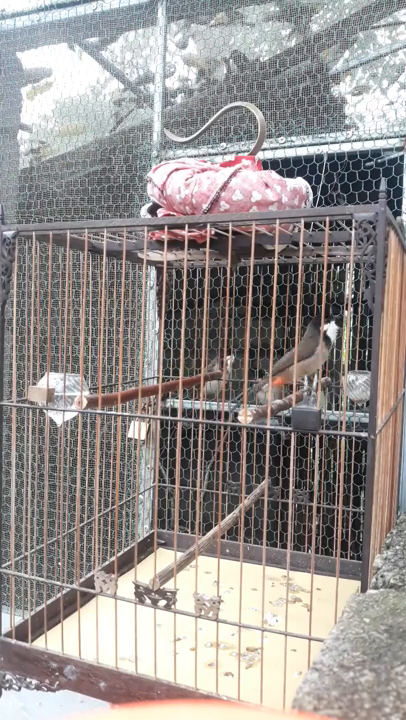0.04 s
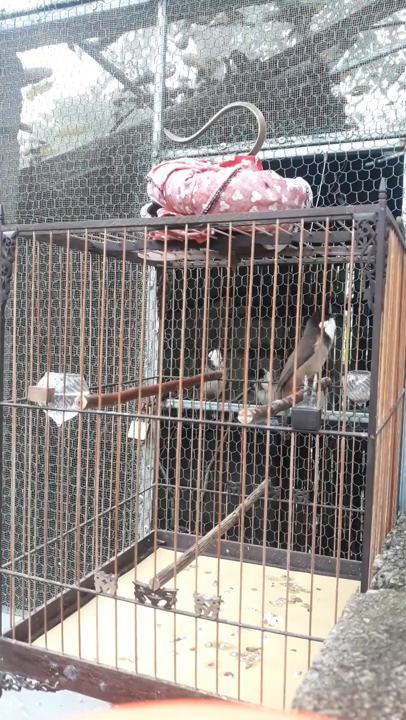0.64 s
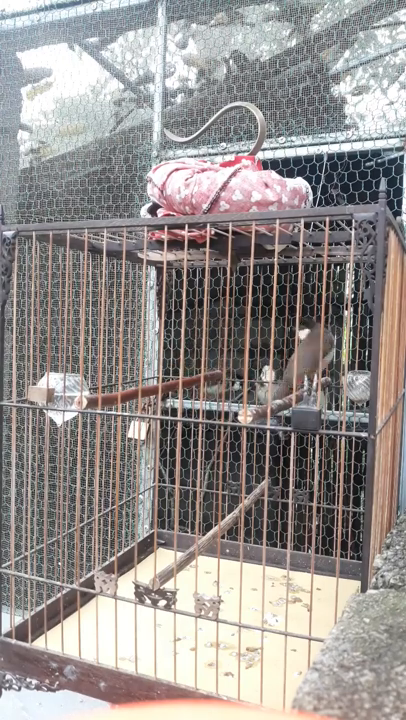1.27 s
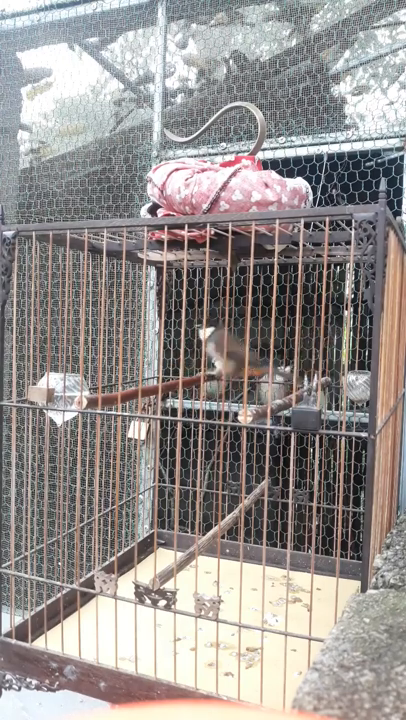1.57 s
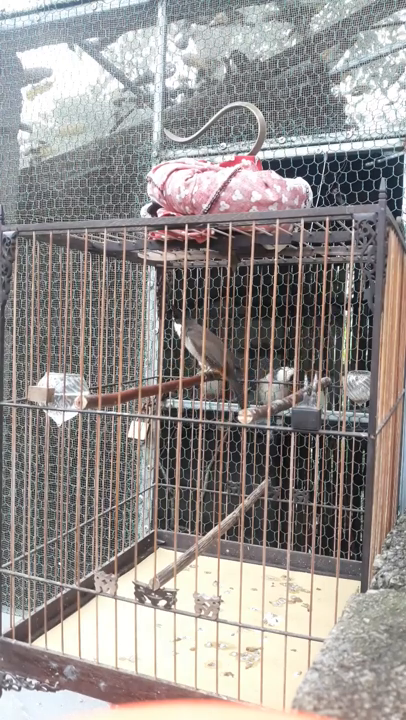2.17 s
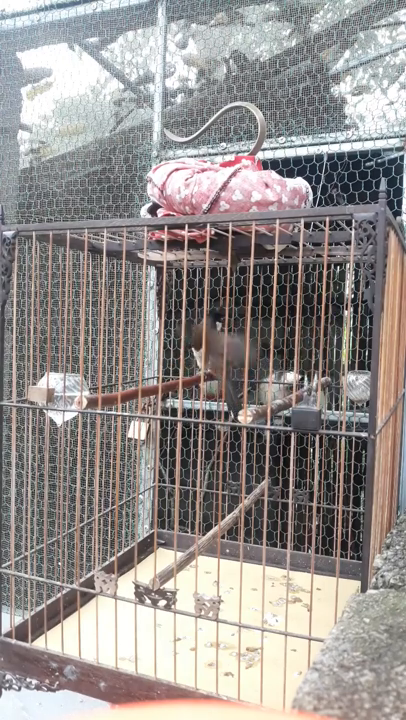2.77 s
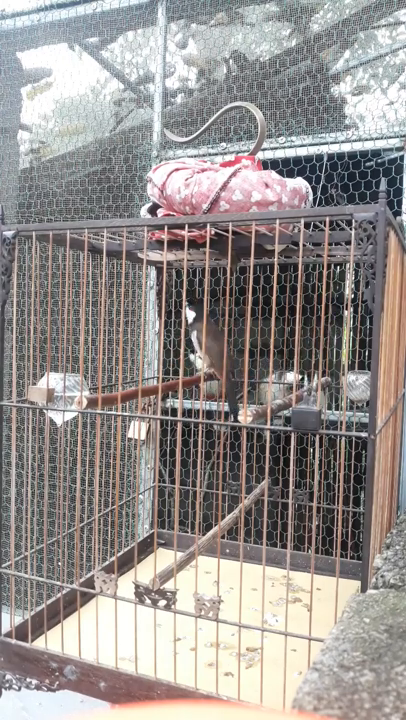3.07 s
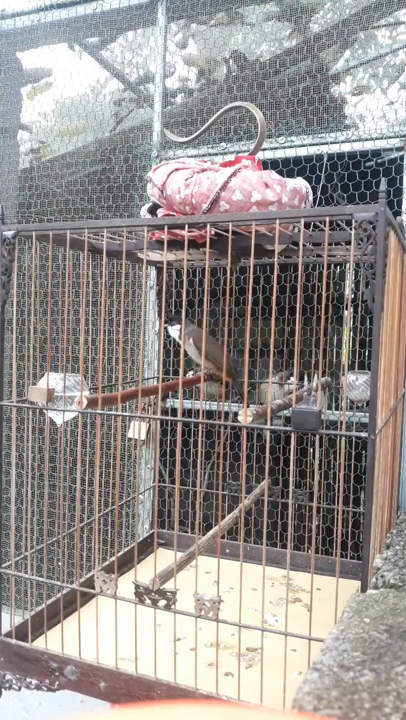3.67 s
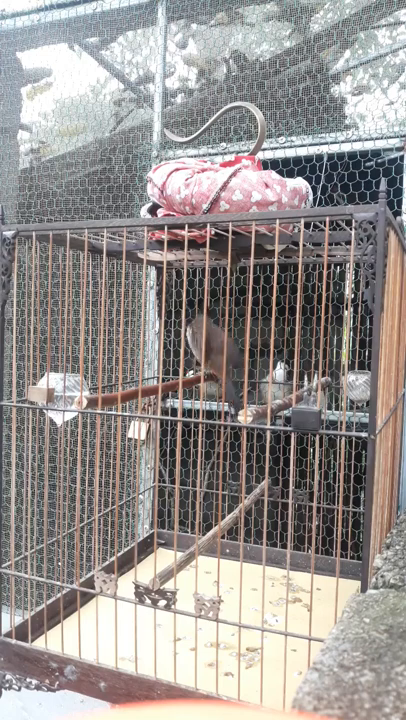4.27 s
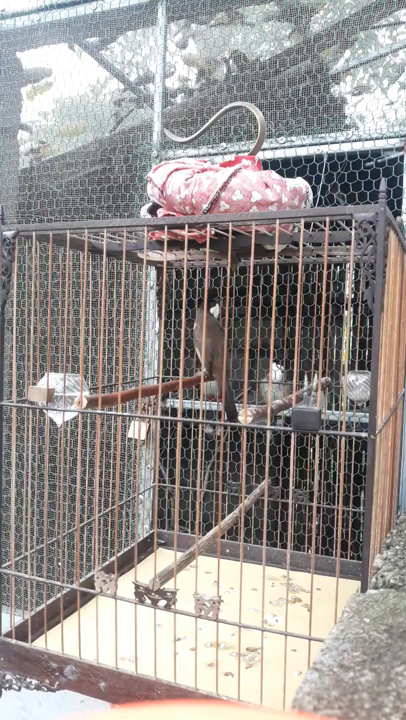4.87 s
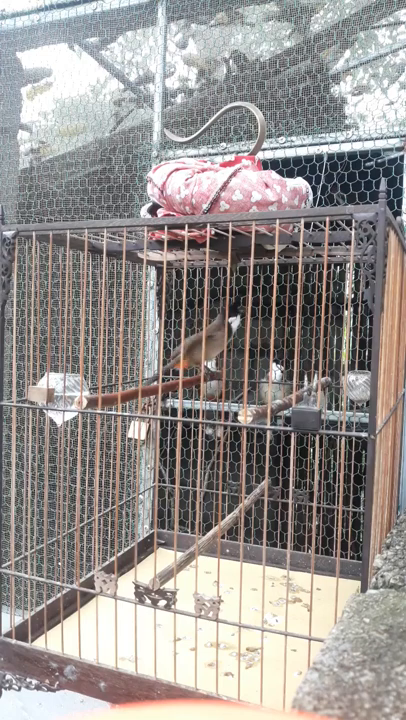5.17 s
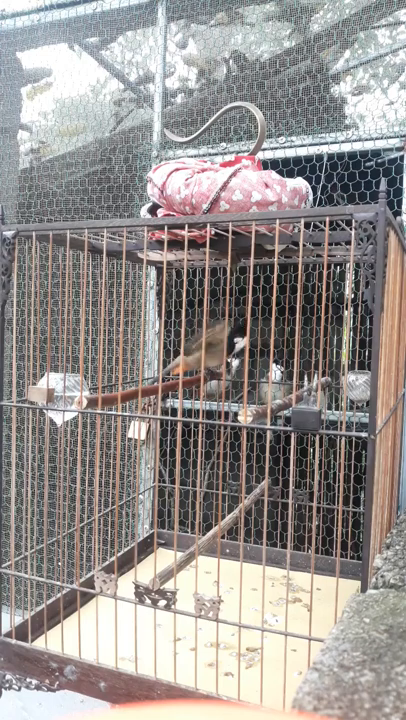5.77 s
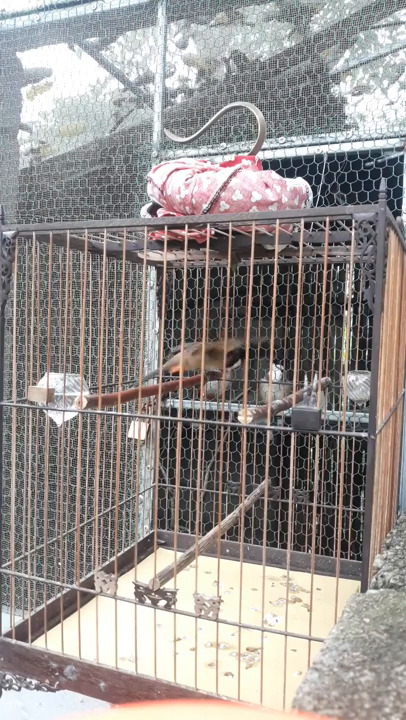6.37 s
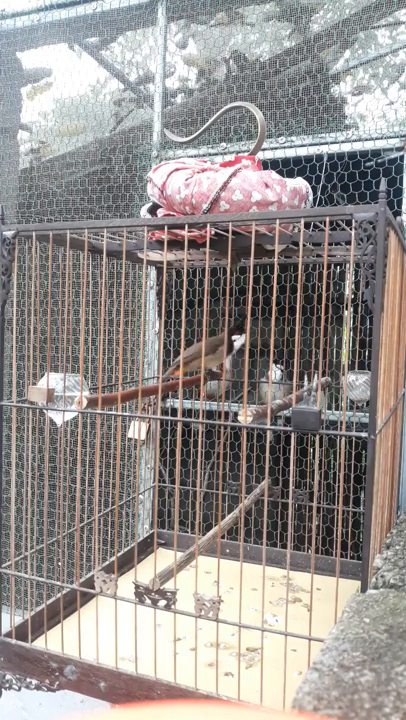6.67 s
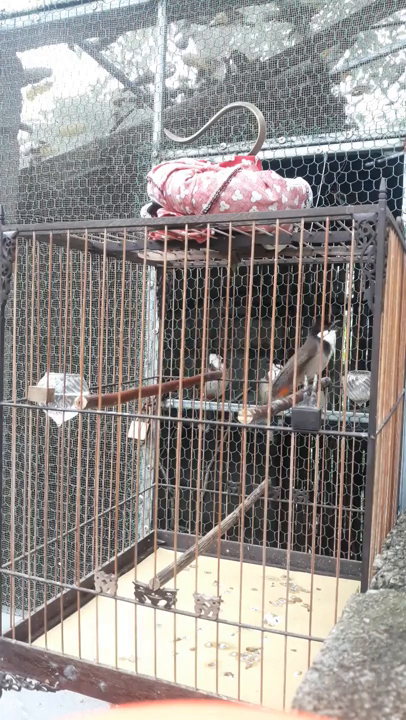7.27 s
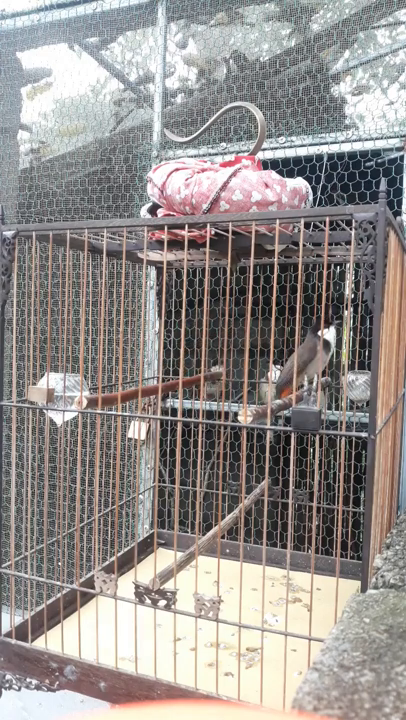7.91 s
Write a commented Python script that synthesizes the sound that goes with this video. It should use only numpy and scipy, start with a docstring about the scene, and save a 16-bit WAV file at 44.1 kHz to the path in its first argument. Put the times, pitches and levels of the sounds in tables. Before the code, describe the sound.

Bright chirps and short trilled phrases from a nearby bird, with faint wing flutters, farther birds and cicadas outdoors.

```python
"""A yard with a netted shelter. Close by, a caged bulbul sings quick runs of whistled and trilled
notes, near-sine tones from its syrinx that echo off the cage, and now and then flutters on its perch.
Other bulbuls answer from further off, blurred by the yard, and a small bird adds thin slurs.
Cicadas hiss in the trees over a faint outdoor rumble, a wash of far birds and a few low hoots."""
import sys
import numpy as np
from scipy import signal
from scipy.fft import rfft, irfft
from scipy.io import wavfile
from scipy.ndimage import uniform_filter1d, minimum_filter1d, map_coordinates

SR = 44100
rng = np.random.default_rng(int(sys.argv[2]) if len(sys.argv) > 2 else 0)


def generate_wav(sig):
    """Save sig (samples, or channels by samples) to the path in sys.argv[1] as 16-bit PCM at SR."""
    pcm = np.round(np.clip(np.atleast_2d(sig).T, -1, 1) * 32767).astype(np.int16)
    wavfile.write(sys.argv[1], SR, pcm)


N = 350137
TIME = np.arange(N) / SR


def gain_of(db):
    return 10 ** (np.asarray(db) / 20)


def unit_rms(x):
    return x / np.sqrt(np.mean(x ** 2) + 1e-20)


def at_hz(points, hz):
    """Interpolates (Hz, value) points on a log-frequency axis."""
    point_hz, value = np.transpose(points)
    return np.interp(np.log(hz + 1), np.log(point_hz + 1), value)


def over_time(rows):
    """Interpolates (seconds, values..) rows; one signal per value column."""
    times_s, *columns = np.transpose(rows)
    return [np.interp(TIME, times_s, column) for column in columns]


def add(mix, start_s, sound):
    part = mix[max(round(start_s * SR), 0):][:len(sound)]
    part += sound[:len(part)]


def samples(start_s, end_s):
    return np.arange(max(int(start_s * SR), 0), min(int(end_s * SR), N))


def noise(spectrum):
    """Coloured noise, rms 1."""
    colour = gain_of(at_hz(spectrum, np.fft.rfftfreq(N, 1 / SR)))
    return unit_rms(irfft(rfft(rng.standard_normal(N)) * colour, N))


def wander(per_s):
    """Random curve, rms 1, with per_s knots a second."""
    knots = rng.standard_normal(N // 16)
    return unit_rms(map_coordinates(knots, [TIME * per_s], order=1, mode="wrap"))


def fade(count, rise_s, fall_s):
    """Envelope of count samples with soft edges."""
    t = np.arange(count) / SR
    return np.sin(np.pi / 2 * np.clip(t / rise_s, 0, 1) * np.clip((t[-1] - t) / fall_s, 0, 1)) ** 2


# Outdoor rumble and merged far birds. Each row: frequency in Hz, relative density in dB.
RUMBLE_SPECTRUM = [(15, -58), (25, -32), (98, -2.5), (149, -3.5), (329, -13.5), (445, -12.5), (485, -12.5),
                   (726, -16.5), (845, -11.5), (1090, -15), (1400, -7), (1820, -5), (3080, -120)]
CHORUS_SPECTRUM = [(900, -28), (1300, -17.5), (1650, -2), (2100, -9), (2500, -7), (3200, 4), (3800, -8),
                   (4800, -53)]
# Swell of the rumble. Each row: time in seconds, level before trim in dB.
RUMBLE_SWELL = [(0.0, -54), (0.97, -63), (1.7, -62.5), (2.76, -60.5), (2.87, -56.5), (3.56, -58),
                (3.85, -62), (4.33, -53.5), (4.49, -56.5), (4.84, -63), (5.31, -61), (5.46, -66.5),
                (6.08, -64.5), (6.85, -56), (7.16, -53.5), (7.38, -61), (7.94, -58)]
def yard_ambience(rumble_trim_db=3, chorus_db=-41.5, chorus_follow=0.67):
    """A low rumble, and a blur of far birds that rises and falls with it."""
    swell_db, = over_time(RUMBLE_SWELL)
    rumble = noise(RUMBLE_SPECTRUM) * gain_of(swell_db + rumble_trim_db + wander(6.9))
    chorus_swell_db = chorus_follow * (swell_db - swell_db.mean()) + 1.8 * wander(14)
    return rumble + noise(CHORUS_SPECTRUM) * gain_of(chorus_db + chorus_swell_db)


# The cicadas' two bands. Each row: frequency in Hz, relative density in dB.
WHINE_SPECTRUM = [(3000, -29.5), (3800, -1.5), (4150, -3), (4400, 1), (4650, -3.5), (5100, -0.5),
                  (5900, -5.5), (6300, -4), (6650, 5), (7000, -2.5), (7500, -9.5), (9000, -44)]
SIZZLE_SPECTRUM = [(6000, -33.5), (7000, -4), (7500, 1), (8500, 2.5), (9200, -5), (10000, -10.5),
                   (11000, -13.5), (12200, -18.5), (14200, -15.5), (15500, -23)]
# Their swell. Each row: time in seconds, whine before trim in dB, sizzle in dB.
CICADA_SWELL = [(0.0, -37.5, -41), (0.33, -39.5, -43), (0.57, -44.5, -46.5), (1.55, -44.5, -49.5),
                (2.41, -42.5, -50.5), (3.25, -39, -43), (4.25, -38, -40), (5.28, -41.5, -42),
                (5.64, -41, -47), (5.97, -41, -47), (6.9, -37, -40.5), (7.94, -37, -38.5)]
def cicadas(whine_trim_db=3):
    """Cicadas merge into a whine and a higher sizzle that slowly swell and ebb."""
    whine_db, sizzle_db = over_time(CICADA_SWELL)
    whine = noise(WHINE_SPECTRUM) * gain_of(whine_db + whine_trim_db + 0.5 * wander(90))
    sizzle = noise(SIZZLE_SPECTRUM) * gain_of(sizzle_db + 0.34 * wander(90))
    return whine + sizzle


# Far hoots. Each row: start in seconds, length in seconds, pitch in Hz, level in dB.
HOOT_NOTES = [(4.07, 0.13, 533, -58), (4.33, 0.19, 526, -59), (4.57, 0.08, 530, -58),
              (5.21, 0.088, 635, -56), (6.962, 0.057, 450, -43)]
def hoots():
    """Soft, pure low notes from afar."""
    out = np.zeros(N)
    for start_s, length_s, hz, db in HOOT_NOTES:
        t = np.arange(int(length_s * SR)) / SR
        tone = np.sqrt(2) * np.sin(2 * np.pi * hz * t)
        add(out, start_s, gain_of(db) * tone * fade(len(t), rise_s=0.051, fall_s=0.037))
    return out


# Decay of the yard's echo and of scatter off leaves and netting. Each row: frequency in Hz, T60 in seconds.
YARD_T60 = [(1000, 0.31), (2200, 0.45), (3400, 0.49), (12000, 0.32)]
SCATTER_T60 = [(1500, 0.38), (4000, 0.072)]
def echo(x, t60_curve, delay_s):
    """Sparse reflections of random sign, each band dying at its own rate."""
    taps = np.zeros(SR)
    slots = np.arange(0, SR - 20, 20)
    taps[slots + rng.integers(0, 20, len(slots))] = rng.choice([-1., 1.], len(slots))
    hz, t, bands = signal.stft(taps, SR, nperseg=256)
    decay = gain_of(-60 * t / at_hz(t60_curve, hz)[:, None])
    _, tail = signal.istft(bands * decay, SR, nperseg=256)
    response = np.concatenate([np.zeros(int(delay_s * SR)), tail / np.linalg.norm(tail)])
    return signal.oaconvolve(x, response)[:N]


def wire_sheen(x, cutoff_hz=6000):
    """Overtones scatter off the wires more than the note itself does."""
    treble = signal.sosfilt(signal.butter(6, cutoff_hz, "high", fs=SR, output="sos"), x)
    return echo(treble, YARD_T60, delay_s=0.0028)


# Early echoes off the cage and its stand. Each row: delay in seconds, gain.
CAGE_TAPS = [(.0023, 0.63), (.0041, -1.5), (.0068, 0.72), (0.0091, -0.82), (0.0138, 0.69), (0.018, -0.36)]
def cage(aside):
    """Sound sent aside comes back off the cage walls and the netting."""
    out = 0.4 * echo(aside, SCATTER_T60, delay_s=0.004)
    for delay_s, gain in CAGE_TAPS:
        add(out, delay_s, gain * aside)
    return out


# Overtones of a bird's note. Each row: multiple of the pitch, relative level before glint in dB.
HARMONICS = [(2, -34.5), (3, -38.5), (4, -55), (5, -35)]
# Glint of an overtone passing certain frequencies. Each row: frequency in Hz, gain in dB.
HARMONIC_GLINT = [(5000, 6), (6000, 0.5), (6900, 2.5), (8600, -1), (9600, -1.5), (10300, 4.5), (11200, 3),
                  (12200, 1), (13600, 1), (15500, -6)]
def syrinx(hz, db, depth_hz, trill_cycles, throb):
    """A near sine whose pitch and strength swing with each trill."""
    trill_phase = 2 * np.pi * trill_cycles
    phase = 2 * np.pi * np.cumsum(hz + depth_hz * np.cos(trill_phase)) / SR
    strength = gain_of(db) * (1 + throb * depth_hz / (depth_hz + 200) * np.sin(trill_phase))
    overtones = sum(gain_of(harmonic_db + at_hz(HARMONIC_GLINT, k * hz)) * np.sin(k * phase)
                    for k, harmonic_db in HARMONICS)
    return np.sqrt(2) * strength * (np.sin(phase) + overtones)


def faint_trills(count=32):
    """Random far trills spread loosely over the scene, in rows like FAR_TRILLS."""
    starts_s = (np.arange(count) + rng.random(count)) / count * TIME[-1]
    lengths_s = rng.uniform(0.046, 0.086, count)
    hz = rng.uniform(2790, 3810, count)
    db = rng.uniform(-52, -43, count)
    depths_hz = rng.uniform(120, 300, count)
    return list(zip(starts_s, lengths_s, hz, db, depths_hz))


# Far trills. Each row: start in seconds, length in seconds, pitch in Hz, source level in dB,
# trill depth in Hz.
FAR_TRILLS = [(0, 0.035, 2380, -21, 280), (0, 0.12, 3348, -26, 325), (0.096, 0.088, 4040, -29.5, 117),
              (0.392, 0.035, 1695, -35, 91.5), (0.504, .051, 3703, -20, 241),
              (0.706, 0.037, 3443, -28, 148.1), (0.791, 0.046, 3265, -31.5, 430),
              (0.919, 0.053, 3500, -31.5, 134), (1.031, 0.051, 3440, -22.5, 506),
              (1.589, 0.088, 2656, -31, 140), (1.655, 0.1, 3284, -36.5, 320),
              (1.865, 0.064, 3400, -37.5, 170), (2.797, 0.033, 3700, -32.5, 170),
              (2.864, .047, 2575, -41, 90), (2.905, .125, 2587, -35.5, 420),
              (3.292, 0.049, 2686, -33.5, 580), (4.145, 0.036, 3625, -30, 250),
              (4.204, 0.098, 3720, -29, 360), (4.229, .063, 2375, -32.5, 420),
              (4.319, .047, 3555, -27, 333), (4.385, 0.079, 2880, -34, 290),
              (4.986, .14, 3726, -24.5, 140.4), (5.036, 0.033, 3840, -23, 334.8),
              (5.185, .072, 3385, -22, 441), (5.237, 0.06, 3522, -19, 459), (5.26, 0.037, 2530, -28, 100),
              (5.384, 0.05, 3444, -25, 630), (5.529, .067, 2887, -27.5, 435),
              (5.679, 0.057, 3130, -30, 375), (5.879, 0.15, 2396, -34.5, 105),
              (6.011, 0.037, 3330, -24.5, 440), (6.066, .073, 3053, -23, 290),
              (6.222, 0.062, 2580, -31.5, 632), (6.294, 0.024, 2540, -24, 600),
              (6.33, 0.023, 1896, -34.5, 86.4), (6.754, 0.024, 2790, -22.5, 205.2),
              (7.177, 0.2, 2695, -37, 265), (7.221, 0.051, 4010, -31.5, 432),
              (7.362, 0.063, 3540, -28, 174), (7.513, 0.063, 3210, -24, 255),
              (7.743, 0.051, 3740, -32, 320)]
# Far whistles. Each row: start in seconds, length in seconds, first and last pitch in Hz,
# source level in dB.
FAR_GLIDES = [(.23, 0.043, 2345, 2360, -26.5), (0.622, 0.11, 1530, 1379, -48.5),
              (.68, .036, 3246, 3255, -20), (0.827, 0.038, 3940, 3810, -27),
              (0.989, 0.046, 2318, 2326, -33.5), (2.318, 0.13, 3000, 2760, -46),
              (2.637, 0.069, 2830, 2480, -40), (3.015, 0.038, 2600, 1890, -42.5),
              (3.225, 0.05, 3200, 2810, -36), (3.308, 0.061, 2420, 2003, -44),
              (3.409, 0.054, 2965, 2800, -36.5), (4.555, 0.044, 3520, 3310, -31),
              (5.32, 0.068, 3407, 2826, -23.5), (5.59, 0.085, 2866, 2704, -34.5),
              (6.188, .03, 1896, 2013, -35), (6.789, 0.036, 2023, 1760, -34.5),
              (7.782, 0.081, 3078, 3000, -18)]
def far_bulbuls(trills_per_s=100, jitter=0.013, climb_per_depth=0.85, waver_hz=61):
    """Birds further off answer with loose, climbing trills and mostly held or falling whistles."""
    out, unsteady, drift = np.zeros(N), wander(400), wander(50)
    notes = []
    for start_s, length_s, hz, db, depth_hz in FAR_TRILLS + faint_trills():
        half_climb_hz = climb_per_depth * depth_hz / 2
        notes.append((start_s, length_s, hz - half_climb_hz, hz + half_climb_hz, db, depth_hz))
    notes += [(*row, waver_hz) for row in FAR_GLIDES]
    for start_s, length_s, first_hz, last_hz, db, depth_hz in notes:
        at = samples(start_s - 0.022, start_s + length_s)
        hz = np.linspace(first_hz, last_hz, len(at)) * (1 + jitter * unsteady[at])
        trill_cycles = np.cumsum(trills_per_s * (1 + 0.1963 * drift[at])) / SR
        opening = 0.65 + 0.35 * np.sin(np.linspace(0, np.pi, len(at)))
        note = syrinx(hz, db, depth_hz * opening, trill_cycles, throb=0.67)
        out[at] += note * fade(len(at), rise_s=0.044, fall_s=0.008)
    return out


# Thin slurs. Each row: start in seconds, length in seconds, first and last pitch in Hz, level in dB.
SLUR_NOTES = [(1.72, 0.14, 4600, 5040, -45.5), (6.233, 0.013, 4660, 5580, -29),
              (6.502, 0.0148, 3890, 5360, -31), (7.229, 0.16, 4630, 5180, -37.5)]
def small_bird(jitter=0.0027):
    """A small bird in the open whistles straight upward slurs with almost no waver."""
    out, unsteady = np.zeros(N), wander(100)
    for start_s, length_s, first_hz, last_hz, db in SLUR_NOTES:
        at = samples(start_s, start_s + length_s)
        hz = np.linspace(first_hz, last_hz, len(at)) * (1 + jitter * unsteady[at])
        note = syrinx(hz, db, depth_hz=0, trill_cycles=0, throb=0)
        out[at] += note * fade(len(at), rise_s=0.0026, fall_s=0.0017)
    return out


# Feather noise. Each row: frequency in Hz, relative density in dB.
FEATHER_SPECTRUM = [(100, -14), (400, -14), (800, -8), (1700, 3.5), (3000, -5), (6000, -22), (14000, -46)]
# Flutters and hops. Each row: start in seconds, length in seconds, level in dB.
WING_FLUTTERS = [(0.091, 0.29, -44), (3.259, .15, -37), (4.441, 0.063, -43.5), (4.669, 0.046, -39),
                 (6.214, 0.17, -50), (6.477, 0.11, -44), (7.167, 0.035, -34)]
def wings(beats_per_s=28):
    """Feathers brush the air in a few quick beats."""
    strength = np.zeros(N)
    for start_s, length_s, db in WING_FLUTTERS:
        t = np.arange(int(length_s * SR)) / SR
        beats = 1 + 0.46 * np.cos(2 * np.pi * beats_per_s * t)
        add(strength, start_s, gain_of(db) * np.hanning(len(t)) * beats)
    return strength * noise(FEATHER_SPECTRUM)


def note_span(start_s, length_s):
    """A note's samples, soft edges included, and its progress 0-1 at each."""
    at = samples(start_s - 0.002, start_s + length_s + 0.006)
    return at, np.clip((TIME[at] - start_s) / length_s, 0, 1)


def flick(start_s, length_s, low_hz, peak_hz, db, depth_hz, trills_per_s=95, away=0.38, peak_at=0.3):
    """One quick push lifts the pitch and widens the trill; both sink back."""
    at, progress = note_span(start_s, length_s)
    push = (progress / peak_at * np.exp(1 - progress / peak_at)) ** 2
    hz = low_hz + (peak_hz - low_hz) * push
    opening = 0.51 + 0.49 * push
    return at, hz, db - 0.5 * push, depth_hz * opening, trills_per_s, away


def whistle(start_s, length_s, first_hz, middle_hz, last_hz, db, swell_db, depth_hz, trills_per_s, away):
    """Pitch bends along one parabola while the note swells or fades."""
    at, progress = note_span(start_s, length_s)
    slope_hz = (last_hz - first_hz) * (progress - 0.5)
    bow_hz = ((first_hz + last_hz) / 2 - middle_hz) * (2 * progress - 1) ** 2
    level_db = db + swell_db * (progress - 0.5)
    return at, middle_hz + slope_hz + bow_hz, level_db, depth_hz, trills_per_s, away


def chirp(start_s, length_s, first_hz, top_hz, climb, db, loudest_at, depth_hz, trills_per_s, away,
          crescendo_db=13.5, release_db=9):
    """Pitch and strength climb together, then the pitch levels off while the note lets go."""
    at, progress = note_span(start_s, length_s)
    hz = top_hz - (top_hz - first_hz) * (1 - progress) ** climb
    level_db = db - np.interp(progress, [0, loudest_at, 1], [crescendo_db, 0, release_db])
    opening = 0.15 + 0.85 * np.sin(np.pi * progress ** 0.73)  # the trill narrows at both ends
    return at, hz, level_db, depth_hz * opening, trills_per_s, away


# Soft chatter. Each row: start in seconds, length in seconds, low and peak pitch in Hz, level in dB,
# trill depth in Hz.
FLICK_NOTES = [(2.067, .056, 1950, 2540, -36.5, 423), (2.474, .054, 1830, 2420, -32.5, 294),
               (2.533, 0.064, 2036, 2594, -29, 338), (2.719, 0.046, 1700, 2177, -34.5, 130),
               (2.771, 0.039, 1743, 1983, -33, 231), (7.646, 0.0245, 1960, 2310, -25, 190),
               (7.702, 0.015, 1934, 2275, -21, 70.5), (7.825, 0.036, 2120, 2272, -19, 170)]
# Arched or dipping whistles. Each row: start in seconds, length in seconds, first, middle and last pitch
# in Hz, level in dB, swell in dB, trill depth in Hz, trills per second, turned away 0-1.
WHISTLE_NOTES = [(.266, 0.032, 1606, 2113, 2560, -14, 11.5, 26, 95, 0.1),
                 (0.3, 0.038, 3330, 3326, 3357, -7.5, 2, 5, 120, 0.27),
                 (0.416, .012, 2920, 2645, 2730, -10.5, 1, 74, 83, 0),
                 (0.425, 0.043, 2945, 2907, 2830, -3.5, -2.5, 6.9, 79, 0),
                 (.474, .028, 3054, 3170, 2894, -8, -2, 280, 91, 0.2),
                 (0.509, 0.0262, 2260, 1960, 2020, -12, 5, 24, 92, .04),
                 (0.539, 0.03, 2240, 2190, 2100, -16.5, -11, 130, 104, .04),
                 (1.637, 0.031, 2250, 2157, 2220, -22, -7, 35, 91, 0.04),
                 (1.675, 0.078, 2386, 2438, 2445, -20, -3, 11, 95, 0.08),
                 (2.126, .038, 1955, 1860, 2000, -32, 9, 91, 89, 0.15),
                 (2.017, .045, 1990, 1670, 1555, -43.5, -11, 22, 95, 0.57),
                 (2.212, 0.12, 3000, 1980, 1530, -47.5, 1, 12, 120, .3),
                 (3.557, 0.021, 1680, 1566, 1460, -35.5, 4, 106, 114, 0.3),
                 (3.846, 0.014, 1575, 1730, 1820, -38, 3, 92, 99, 0.36),
                 (4.272, .032, 1877, 1811, 1860, -22, 0, 21, 97, 0.1),
                 (4.422, 0.065, 1852, 2080, 2210, -17, -0.5, 21, 110, 0),
                 (4.496, 0.07, 2146, 2113, 1860, -16, -3, 25, 82, 0.14),
                 (4.916, .006, 2590, 2650, 3000, -13, 8, 100, 91, 0.1),
                 (4.923, 0.023, 3320, 3234, 3090, -6, 5, 8, 82, 0.11),
                 (5.012, 0.031, 1714, 1930, 2045, -15, 20.5, 21, 93, 0.15),
                 (5.049, 0.019, 2530, 2850, 2540, -12.5, 9, 200, 72, 0.25),
                 (5.081, 0.06, 2300, 2390, 2280, -15.5, -1, 144, 81, 0.13),
                 (5.141, 0.026, 2090, 1975, 1825, -18, -6, 120, 84, 0.1),
                 (5.173, 0.064, 1675, 1593, 1490, -31.5, -5, 8, 97, .17),
                 (5.284, .036, 2044, 1697, 1464, -34.5, -6, 35, 90, 0.43),
                 (5.741, 0.04, 1910, 1800, 1770, -36, -4, 80, 110, 0.03),
                 (5.777, 0.04, 2040, 2490, 1670, -35.5, 0, 5, 90, .24),
                 (5.815, 0.04, 1455, 1880, 1870, -36, 3, 20, 71, 0.47),
                 (6.433, .034, 2050, 2016, 1960, -36.5, 2, 16, 91, 0.58),
                 (6.534, 0.042, 1570, 1290, 1180, -47, -2, 30, 93, 0.52),
                 (6.578, 0.026, 1890, 1853, 1790, -32.5, -1, 150, 124, 0.87),
                 (7.052, 0.025, 1564, 1570, 1680, -27, 2, 10, 33, 0.2),
                 (7.08, 0.091, 1930, 2034, 1876, -22.5, -3, 185, 25.8, .04),
                 (7.553, 0.019, 1710, 1410, 1300, -44, -5, 78, 93, 0.4),
                 (7.669, 0.035, 1927, 1905, 1896, -19.5, -3, 12, 120, 0.17),
                 (7.852, 0.035, 2020, 1977, 1995, -19.5, -1, 30, 86, 0.55)]
# Rising, trilled chirps. Each row: start in seconds, length in seconds, first and top pitch in Hz,
# climb (1 even, 4 early), level in dB, loudest point 0-1, trill depth in Hz, trills per second,
# turned away 0-1.
CHIRP_NOTES = [(0.076, 0.057, 1800, 2553, 2.9, -7, 0.77, 300, 79, 0.37),
               (1.096, 0.057, 2120, 2413, 2.8, -19.5, 0.65, 70, 85, 0.35),
               (1.229, 0.11, 2055, 3445, 3.6, -18.5, .38, 250, 124.4, .6),
               (1.418, .082, 1685, 2737, 2.83, -18.5, .6, 150, 101.6, .6),
               (1.511, 0.047, 2840, 3450, 2.64, -11.5, 0.71, 173, 100, 0.56),
               (4.055, 0.077, 2120, 2962, 1.87, -8.5, 0.73, 220, 90, 0.25),
               (4.301, 0.065, 1860, 2530, 2.46, -8, .75, 170, 95.6, 0.14),
               (4.615, 0.089, 2230, 3305, 2.9, -8, 0.58, 340, 142.5, 0.15),
               (4.832, .075, 1880, 2549, 1.5, -7.5, 0.88, 240, 97.5, 0.03),
               (6.464, 0.084, 1990, 2480, 4.1, -24.5, 0.27, 120, 91, 0.49),
               (6.603, .13, 1810, 3394, 4, -22.5, 0.33, 260, 116.8, 0.48),
               (7.43, 0.073, 2150, 3230, 1.69, -11, 0.79, 260, 126, 0.29),
               (7.898, 0.037, 2190, 3240, 2.2, -16, 0.77, 230, 93, .68)]
def caged_bulbul(jitter=0.0053, flicker_db=1.92, fizz_db=-35.5):
    """The near bird sings; turning away splits each note into sound sent ahead and sound sent aside."""
    ahead, aside = np.zeros((2, N))
    unsteady, flicker, drift = wander(600), wander(300), wander(60)
    air = fizz_noise()
    notes = [chirp(*row) for row in CHIRP_NOTES]
    notes += [whistle(*row) for row in WHISTLE_NOTES]
    notes += [flick(*row) for row in FLICK_NOTES]
    for at, hz, db, depth_hz, trills_per_s, away in notes:
        trill_cycles = np.cumsum(trills_per_s * (1 + 0.1 * drift[at])) / SR
        unsteady_hz = hz * (1 + jitter * unsteady[at])
        tone = syrinx(unsteady_hz, db + flicker_db * flicker[at], depth_hz, trill_cycles, throb=0.46)
        fizz = air[at] * gain_of(fizz_db + db) * (0.4 + depth_hz / (depth_hz + 30))  # most on trills
        note = (tone + fizz) * fade(len(at), rise_s=0.005, fall_s=0.012)
        ahead[at] += np.sqrt(1 - away ** 2) * note
        aside[at] += away * note
    return ahead, aside


# Fizz of a loud note. Each row: frequency in Hz, relative density in dB.
FIZZ_SPECTRUM = [(4000, -1.5), (9000, -31), (10500, 9.5), (13500, 6.5), (15500, 7)]
def fizz_noise():
    """The thin hiss that rides on the near bird's notes."""
    return noise(FIZZ_SPECTRUM)


def scene():
    """Near and far birds with their echoes, over the background; mono."""
    ahead, aside = caged_bulbul()
    far = far_bulbuls()
    near = ahead + cage(aside) + small_bird()
    close = near + gain_of(-13) * echo(near, YARD_T60, delay_s=0.012)
    blurred = 0.5 * far + 0.75 * echo(far, SCATTER_T60, delay_s=0)  # far notes arrive mostly scattered
    distant = gain_of(1.5) * blurred + gain_of(-3.5) * echo(far, YARD_T60, delay_s=0.01)
    sheen = gain_of(-9) * wire_sheen(ahead + 2 * aside + 2 * far)
    return (yard_ambience() + cicadas() + hoots() + distant + sheen + wings() + close)[None]


def record(dry, low_cut_hz=38, ceiling=0.97, high_cut_hz=15700):
    """Microphone bass cut, peak limiter, then band limit."""
    lean = signal.sosfilt(signal.butter(4, low_cut_hz, "high", fs=SR, output="sos"), dry)
    needed_gain = 1 / np.maximum(abs(lean) / ceiling, 1)
    limited = lean * uniform_filter1d(minimum_filter1d(needed_gain, size=129), size=129)
    lowpass = signal.firwin(511, high_cut_hz, window=("kaiser", 9), fs=SR)
    return signal.oaconvolve(limited, lowpass[None], "same")


dry = scene()
out = record(dry)
generate_wav(out)
```